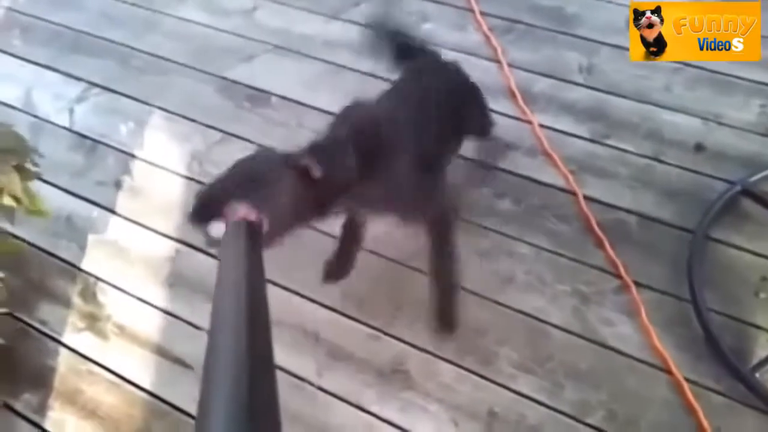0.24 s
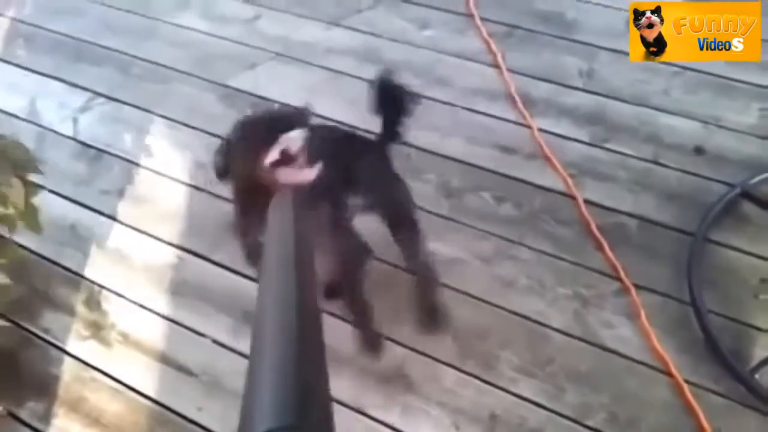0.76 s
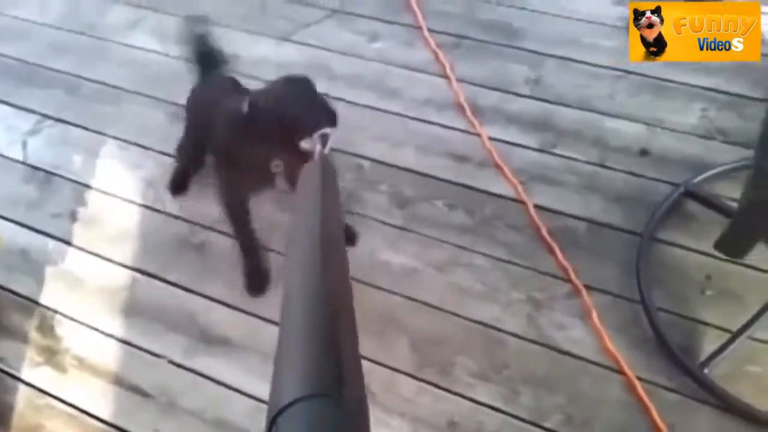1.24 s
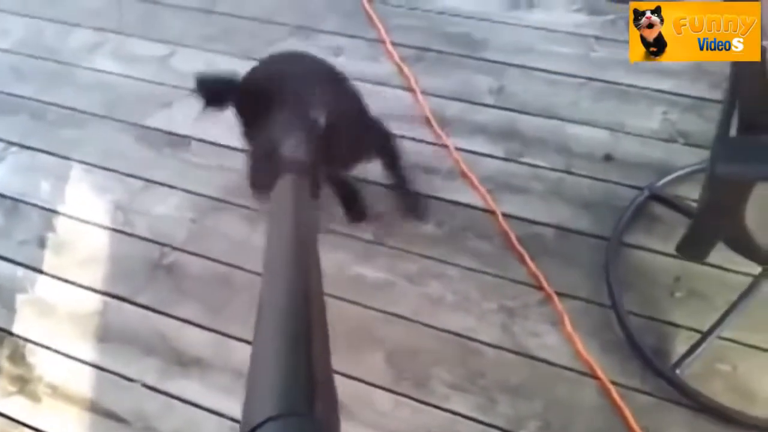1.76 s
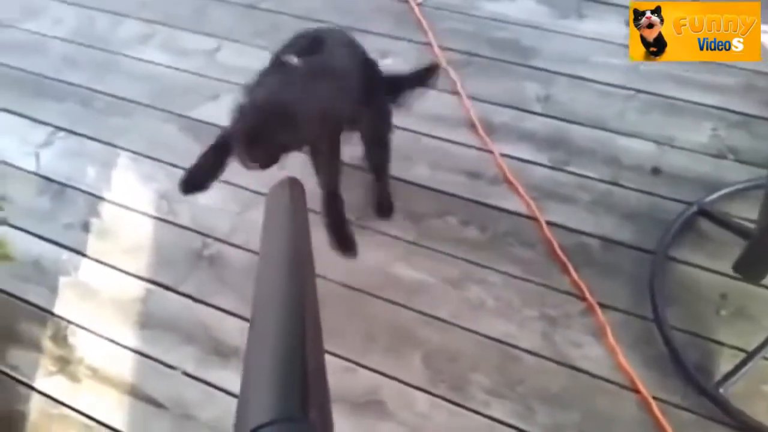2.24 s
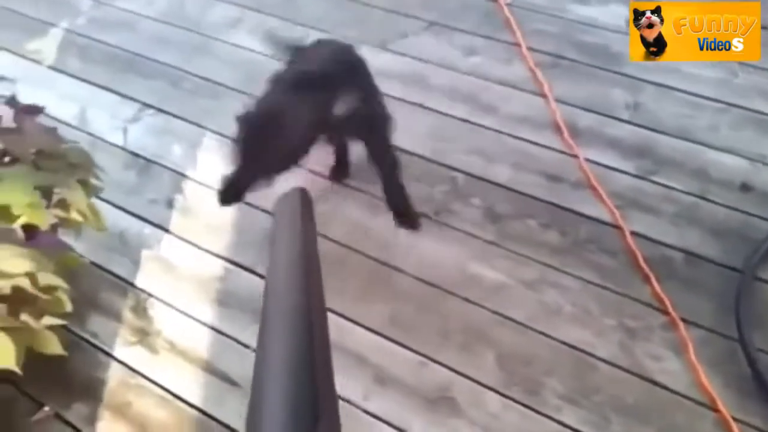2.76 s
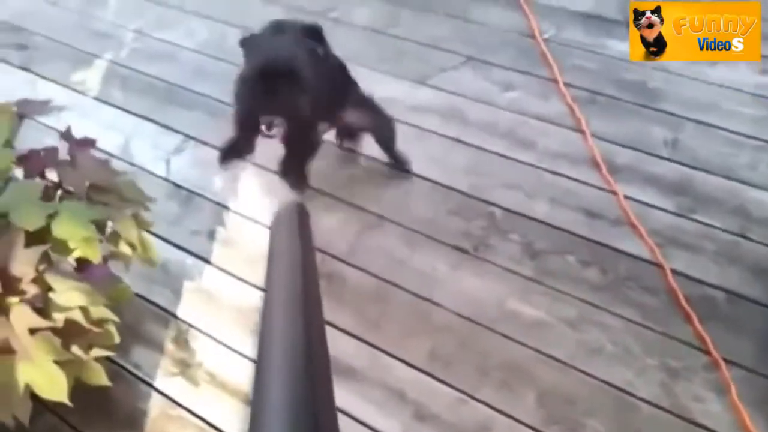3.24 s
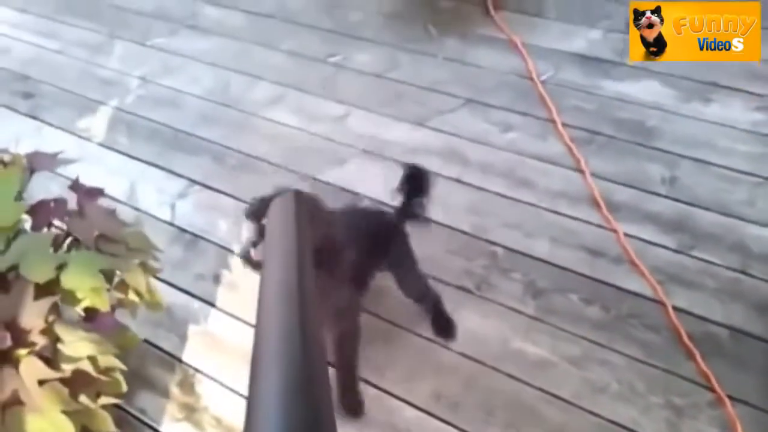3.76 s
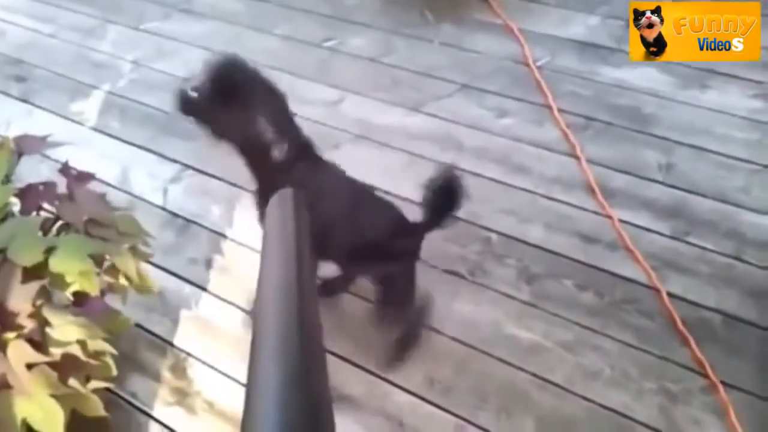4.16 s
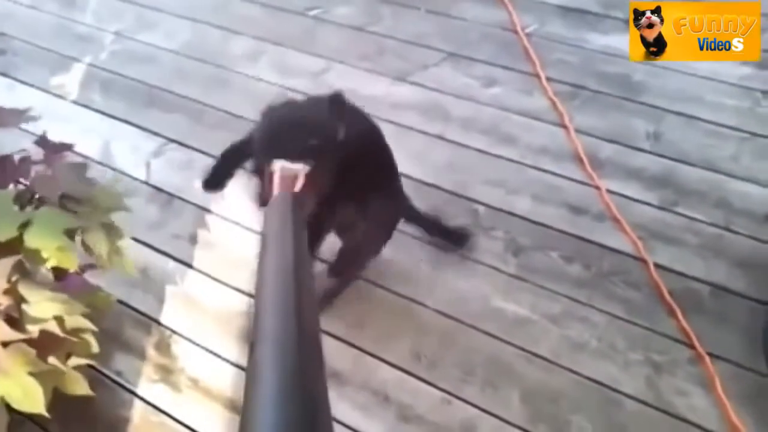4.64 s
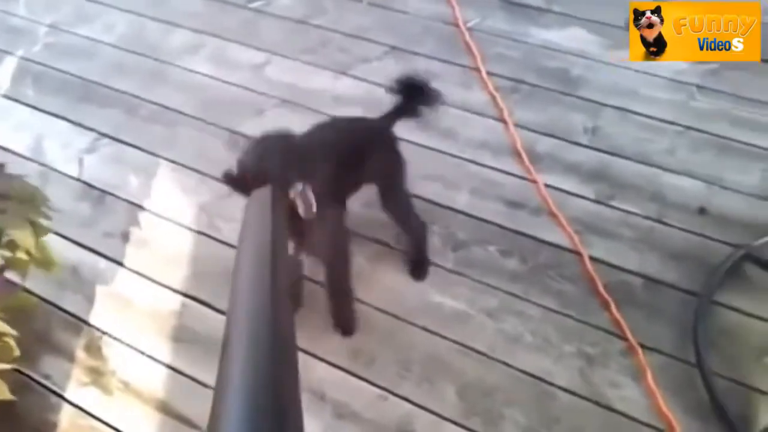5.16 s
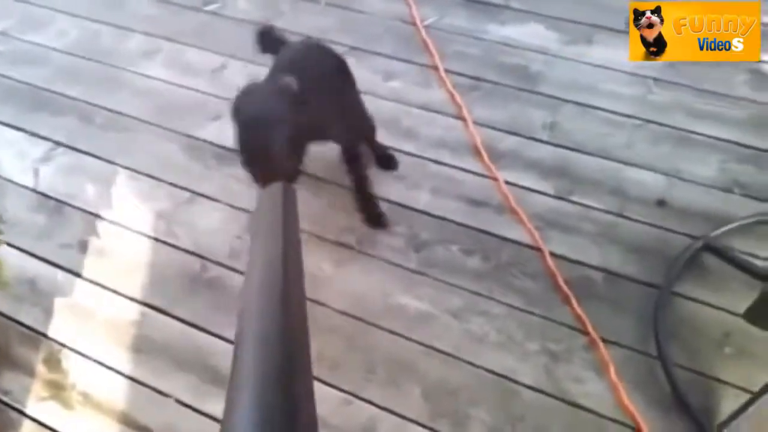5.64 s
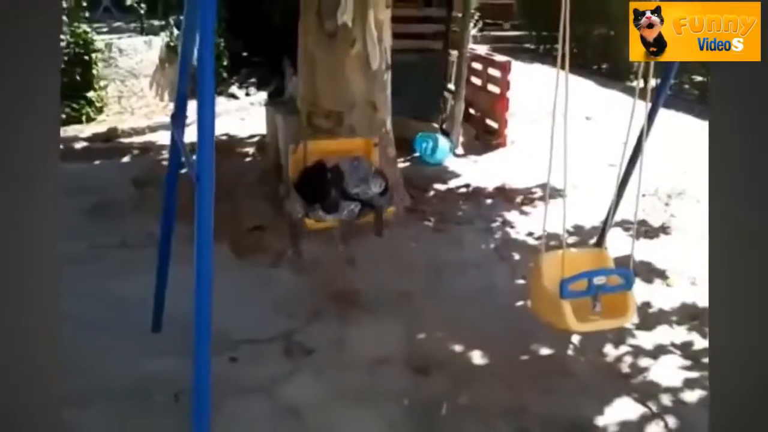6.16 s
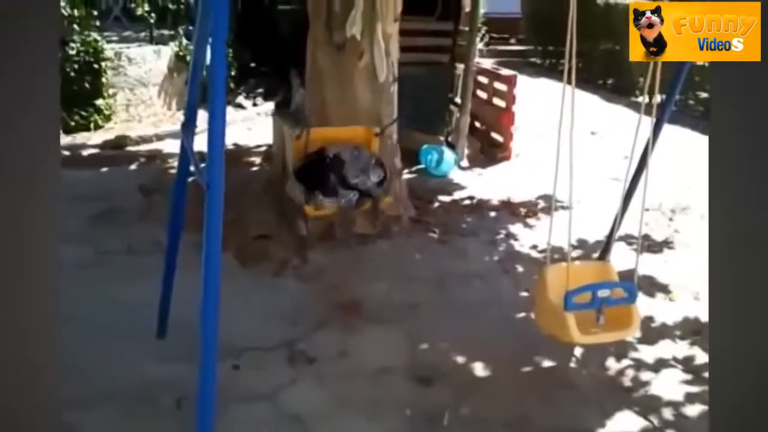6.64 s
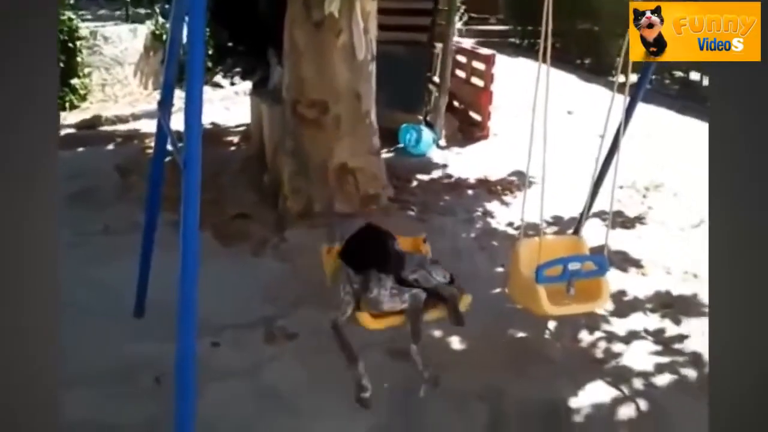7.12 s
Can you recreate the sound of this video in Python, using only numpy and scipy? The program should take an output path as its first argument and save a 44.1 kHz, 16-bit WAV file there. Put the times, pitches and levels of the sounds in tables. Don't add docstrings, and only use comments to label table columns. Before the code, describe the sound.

On a wooden deck, an electric leaf blower roars close to a small overloaded microphone, a steady whine inside harsh rushing air. A dog snapping at the stream makes the hiss swell and flutter, with brief hollow, vowel-like colours. It stops abruptly. After a short silence, a much quieter yard fades in: low wind bumps, soft airy hiss, a metal swing's hum, rough creaks and a rising squeak.

```python
import sys
import numpy as np
from scipy import signal
from scipy.io import wavfile
from scipy.ndimage import uniform_filter1d

SR = 44100
rng = np.random.default_rng(int(sys.argv[2]) if len(sys.argv) > 2 else 0)


def elevation(decibels):
    levels = np.asarray(decibels, float)
    return 10 ** (levels / 20)


def materialize(psi):
    bounded = np.clip(np.atleast_2d(psi).T, -1, 1)
    quanta = np.round(bounded * 32767).astype(np.int16)
    wavfile.write(sys.argv[1], SR, quanta)


N = 325888
TIME = np.arange(N) / SR

# t/s, f/Hz
SHAFT_SPEED = [(0, 180.4), (.65, 180.2), (.8, 181.3), (1.2, 180.7), (2.4, 180.05), (3.2, 179.7),
               (4.4, 179.7), (5.25, 179.5), (5.5, 181.4), (5.84, 181.6)]
MOVING_ORDERS = (4, 8, 10, 12, 6)
HIDDEN_LEVELS = [-42.5, -42, -44.5, -44, -30.5]
# start t/s, length t/s, level above hidden/dB
FACING = [
    [(-.1, .55, 12), (.72, .18, 12.5), (1.1, 1.8, 12.5), (3.25, .1, 16.5), (3.75, 0.42, 9), (4.4, 0.16, 11),
     (5.05, 0.099, 5.5), (5.35, .6, 12)],
    [(-.1, .42, 12.5), (.7, .4, 9.5), (1.18, 0.77, 14), (2.0, 0.89, 13), (3.05, 0.59, 12), (3.7, 0.76, 14),
     (5.5, 0.52, 9.5)],
    [(.4, 0.26, 10), (.75, 0.44, 9), (1.95, 0.25, 13.5), (2.95, 0.29, 9), (3.5, 1.22, 12.5),
     (4.7, 0.2, 6.5), (5.0, 0.29, 9)],
    [(-.1, 0.8, 10), (1.1, 1.34, 12), (2.87, 0.092, 16), (3.65, 0.89, 13.5), (4.8, .18, 11.5),
     (5.55, 0.41, 10)],
    [(-.1, 0.63, 2), (.75, 0.22, 0), (1.15, 1, 2.5), (2.5, 0.53, 3), (3.05, .6, 1), (4.9, 1.1, 1)],
]
STEADY_ORDERS = (1, 2, 2.586, 3, 11.33, 15, 16, 18, 20, 21, 22)
STEADY_LEVELS = [-46, -40.5, -30.5, -37.5, -42.5, -41, -41.5, -38, -42.5, -42, -39.5]


def motor():
    turn_s = 0.16
    _, (speed,) = columns(SHAFT_SPEED)
    speed = speed * (1 + 0.00066 * wander(25))
    out = np.zeros(N)
    for order, hidden_db, turns in zip(MOVING_ORDERS, HIDDEN_LEVELS, FACING):
        level_db = hidden_db + sum(rise_db * held(s, length, turn_s) for s, length, rise_db in turns)
        out += tone(order * speed, level_db, waver_db=1.5, waver_hz=8.9)
    for order, level_db in zip(STEADY_ORDERS, STEADY_LEVELS):
        out += tone(order * speed, level_db, waver_db=2.0, waver_hz=3.3)
    return out


# f/Hz, level per Hz/dB
JET_SPECTRUM = [(12, -57), (20, -17.5), (125, -22.5), (285, -12.5), (415, -7.5), (458, -5), (589, -9),
                (702, -4), (857, -10), (1070, -9), (1310, -8.5), (2110, -8), (6690, -11.5), (7970, -17),
                (10400, -62), (17500, -120)]
# f/Hz, width f/Hz, level/dB
TUBE_MODES = [(688, 78, 3), (954, 160, 6), (1860, 130, 1.5), (4100, 410, 2)]
# t/s, length t/s, f/Hz, width f/Hz, level over the roar/dB
MOUTH_RINGS = [(.22, .08, 2290, 402, 5.5), (.43, .08, 654, 120.3, 2.5), (0.569, .14, 2440, 600, 5.5),
               (0.839, .14, 1916, 250, 9.5), (0.847, .12, 1570, 200, 5.5), (1.12, .1, 2386, 400, 4.5),
               (2.438, .08, 2050, 459, 7), (2.928, 0.069, 2070, 403, 7.5), (2.472, .08, 930, 200, 3),
               (2.997, .08, 1850, 251.5, 5), (3.673, .12, 1820, 250, 3), (3.9, .12, 1266, 250, 8.5),
               (4.05, .08, 1350, 200.4, 10), (4.419, .08, 1800, 200, 10), (4.65, .2, 1020, 250, 0.5),
               (4.762, .1, 1790, 400, 4.5), (4.88, .08, 1820, 299, 8.5), (4.82, .1, 3050, 300, 5.5),
               (5.47, .08, 2350, 300, 1), (5.7, .14, 1670, 200, 8), (5.3, .3, 1420, 199, -2.5)]
# start t/s, length t/s, extra hiss level/dB
CROSSINGS = [(0.01, .08, 3), (0.184, .1, 4.5), (0.436, .73, 3), (0.643, .1, 1.5), (.95, .22, 0),
             (1.505, .1, 0.5), (1.786, .1, 2.5), (1.96, .07, -1), (2.332, .12, 3.5), (2.63, .1, 2),
             (2.953, .1, 2), (3.103, .18, -0.5), (3.4, .1, -0.5), (3.787, .1, 1.5), (4.4, 1.6, 0.5),
             (4.706, .09, 3), (4.86, .07, 3.5), (5.02, .1, 1), (5.17, .09, 3), (5.27, .11, 2.5),
             (5.534, .18, 2)]


def jet():
    edge_s = 0.04
    scatter_db = sum(db * held(s, length, edge_s) for s, length, db in CROSSINGS) - 3.0
    air = noise(JET_SPECTRUM, TUBE_MODES, MOUTH_RINGS, patchy_db=1.42)
    hiss = signal.sosfiltfilt(signal.butter(1, 4200, "highpass", fs=SR, output="sos"), air)
    body = signal.sosfiltfilt(signal.butter(1, 900, fs=SR, output="sos"), air)
    hiss_gain = elevation(1.45 * scatter_db + 1.0 * wander(18))
    body_gain = elevation(-0.6 * scatter_db + 0.7 * wander(3))
    roar_gain = elevation(0.081 * scatter_db - 20.0)
    return roar_gain * (air + hiss * (hiss_gain - 1) + body * (body_gain - 1))


# f/Hz, level/dB
CRACKLE = [(0, 0), (7900, 0), (8500, -3.5), (10300, 0.8), (14850, 0.9), (15050, -2.5), (SR / 2, -2)]


def overload(x, ceiling=0.23, drive_db=3.0, edge_hz=7700, hard=0.2, leak=0.27):
    soft = ceiling * np.tanh(elevation(drive_db) * x / ceiling)
    low_pass = signal.firwin(101, edge_hz, window=("kaiser", 7), fs=SR)
    narrow = signal.oaconvolve(soft, low_pass, "same")
    shaved = (1 - leak) * (narrow - np.clip(narrow, -hard, hard))
    shaved += elevation(-58) * rng.standard_normal(N)
    hz, db = np.transpose(CRACKLE)
    colour = signal.firwin2(129, np.minimum(hz, SR / 2), elevation(db), fs=SR)
    return narrow - signal.oaconvolve(shaved, colour, "same")


# start t/s, end t/s, level/dB, f/Hz, width f/Hz
SPLASH = (5.854, 5.862, -36, 3250, 2300)


def blower():
    cut_s = 5.847
    start, end, db, hz, width = SPLASH
    splash = elevation(db) * evened(band(rng.standard_normal(N), hz - width / 2, hz + width / 2, order=4))
    splash *= uniform_filter1d(1. * (TIME > start) * (TIME < end), size=60)
    after = np.maximum(TIME - cut_s, 0)
    trail = (TIME > cut_s) * elevation(-43 - 1300 * after) * band(rng.standard_normal(N), 200, 3000)
    ring = (TIME > end) * elevation(-43 - 750 * after) * np.sin(2 * np.pi * 2110 * TIME)
    return overload(motor() + jet()) * (TIME < cut_s) + splash + trail + ring


# start t/s, length t/s, f/Hz, level/dB, pitch scatter (fraction)
RUBS = [
    (6.68, .46, 494, -50, .003),
    (7.15, .06, 490, -58, .003),
    (6.7, .07, 760, -55, .02),
    (6.565, .11, 940, -47, .04),
    (6.7, .11, 950, -52, .03),
    (6.7, .135, 1112, -52, .008),
    (6.82, .1, 920, -60, .04),
    (6.93, .04, 945, -56, .02),
]
# t/s, slip rate f/Hz, level/dB
SQUEAK = [(7.15, 791, -64), (7.168, 795, -47), (7.19, 831, -53), (7.212, 866, -51), (7.268, 873, -49),
          (7.294, 873, -49), (7.39, 867, -44.5)]
# partial number, level over a line 3 dB below the fundamental/dB, locking t/s
SQUEAK_PARTIALS = [(2, -10, 7.2), (3, -1, 7.235), (4, 1, 7.2), (5, -7, 7.31), (6, -4, 7.21), (8, -15, 7.24)]
# t/s, level/dB, f/Hz, 60 dB decay t/s
TICK = (7.133, -41, 3900, .006)


def swing():
    out = np.zeros(N)
    for start, length, hz, db, scatter in RUBS:
        pitch = hz * (1 + scatter * wander(57.7))
        out += held(start, length, 0.035) * tone(pitch, db, waver_db=2.5, waver_hz=45)

    gate, (slip, db) = columns(SQUEAK)
    unsure = np.clip((7.225 - TIME) / .04, 0, 1)
    slip = slip * (1 + (.007 + .025 * unsure) * wander(90))
    squeak = tone(slip, db - 0.1 * unsure, waver_db=2.5, waver_hz=45)
    for partial, up_db, locks in SQUEAK_PARTIALS:
        unlocked_db = 11.0 * np.clip((locks - TIME) / .03, 0, 1)
        squeak += tone(partial * slip, db - 3.0 + up_db - unlocked_db, waver_db=3.0, waver_hz=45)

    start, db, hz, t60 = TICK
    after = np.maximum(TIME - start, 0)
    tick = elevation(db - 60 * after / t60) * np.sin(2 * np.pi * hz * after)
    return out + gate * squeak + tick


# start t/s, length t/s, slow push level over calm/dB, quick thump level over calm/dB
GUSTS = [(6.56, 0.092, 11, 10), (6.66, 0.14, 8.3, 8), (6.82, 0.097, 12.5, 14), (6.96, 0.066, 10, 8),
         (7.03, 0.1, 8.9, 20.5), (7.15, 0.075, 8, 3), (7.26, 0.071, 5.9, 16), (7.36, .06, 11, 26)]
# f/Hz, level per Hz/dB
AIR_SPECTRUM = [(94, -39.5), (160, -5.5), (400, -13.5), (486, -15), (545, -11), (744, -14), (920, -15),
                (3460, -20), (7230, -15), (7970, -15), (10400, -53), (17500, -120)]
# t/s, length t/s, f/Hz, width f/Hz, level/dB
FRAME_RINGS = [(6.74, .07, 720, 40, 12), (6.76, .13, 1030, 330, 6), (6.99, 0.27, 1530, 200, 10),
               (6.62, .1, 2800, 200, 11), (6.59, .06, 3500, 200, 11), (7.17, .05, 3000, 400, 8)]


def yard():
    push_db, thump_db = sum(np.outer([push, thump], held(s, length, 0.028))
                            for s, length, push, thump in GUSTS)
    wind = elevation(-45 + push_db) * buffet(10.0, 24.3)
    wind += elevation(-57.5 + thump_db) * buffet(45, 85)
    air = elevation(-45.5 + 0.8 * wander(6)) * noise(AIR_SPECTRUM, passing=FRAME_RINGS, patchy_db=0.9)
    leaf_gain = elevation(-64.5 + .1 * push_db + 1.2 * wander(30))
    leaves = leaf_gain * evened(band(rng.standard_normal(N), 6400, 8900, order=3))
    return wind + air + leaves


def buffet(low_hz, high_hz):
    swings = band(rng.standard_normal(N), low_hz, high_hz)
    return evened(swings / (abs(signal.hilbert(swings)) + 0.92 * swings.std()))


def noise(spectrum, modes=(), passing=(), patchy_db=1.):
    frames, hz = N // 256 + 5, np.fft.rfftfreq(1024, 1 / SR)
    a, b, patches = rng.standard_normal((frames, 513, 3)).T
    patches = uniform_filter1d(patches, size=10, axis=0)
    patches = evened(uniform_filter1d(patches, size=12, axis=1))
    f, level = np.transpose(spectrum)
    db = np.interp(np.log(hz + 1), np.log(f + 1), level)
    for mid, width, peak in modes:
        db = db + peak / (1 + (2 * (hz - mid) / width) ** 2)
    field, t = db[:, None] + patchy_db * patches, np.arange(frames) * 256 / SR
    for s, length, mid, width, peak in passing:
        in_pitch = np.exp(-(2 * (hz - mid) / width) ** 2)
        in_time = np.exp(-(2 * (t - s) / length) ** 2)
        field = field + peak * np.outer(in_pitch, in_time)
    return evened(signal.istft((a + 1j * b) * elevation(field), nperseg=1024, noverlap=768)[1][:N])


def tone(hz, db, waver_db=-0.5, waver_hz=12):
    phase = 2 * np.pi * (np.cumsum(hz) / SR + rng.random())
    return np.sqrt(2) * elevation(db + waver_db * wander(waver_hz)) * np.sin(phase)


def wander(hz):
    return evened(signal.lfilter(*signal.butter(2, hz, fs=SR), rng.standard_normal(N)))


def band(x, low_hz, high_hz, order=2):
    return signal.sosfilt(signal.butter(order, [low_hz, high_hz], "bandpass", fs=SR, output="sos"), x)


def evened(x):
    return x / np.sqrt(np.mean(x ** 2) + 1e-20)


def columns(rows):
    s, *values = np.transpose(rows)
    gate = uniform_filter1d(1. * ((TIME > s[0]) & (TIME <= s[-1] + .01)), size=600)
    return gate, [np.interp(TIME, s, v) for v in values]


def held(start, length, edge):
    return np.clip(np.minimum(TIME - start, start + length - TIME) / edge + .5, 0, 1)


def scene():
    yard_s, fade_db, fade_s = 6.563, -16.5, 0.12
    narrow = signal.firwin(201, 8150, window=("kaiser", 9), fs=SR)
    fade = (TIME > yard_s) * elevation(fade_db * np.exp(-np.maximum(TIME - yard_s, 0) / fade_s))
    return (blower() + signal.oaconvolve((yard() + swing()) * fade, narrow, "same"))[None]


def roll_off(x):
    return signal.sosfilt(signal.butter(12, 15650, fs=SR, output="sos"), x)


def record(dry):
    return roll_off(dry)


dry = scene()
out = record(dry)
materialize(out)
```